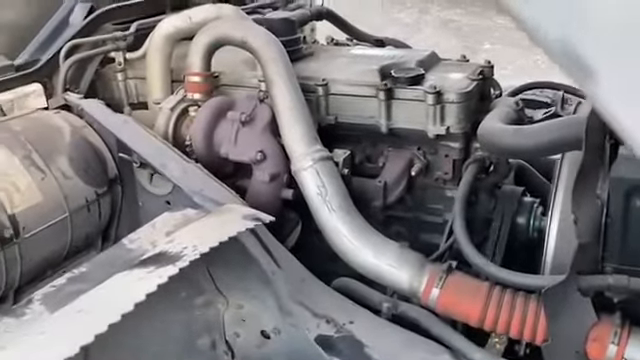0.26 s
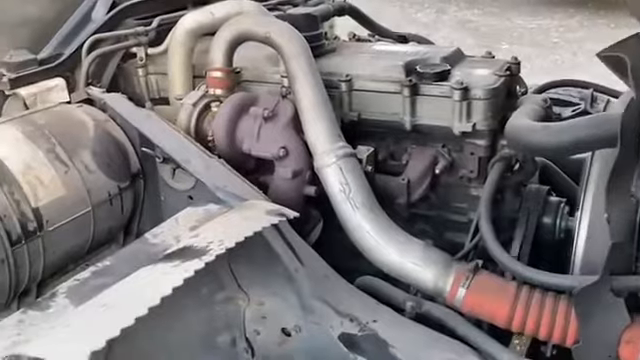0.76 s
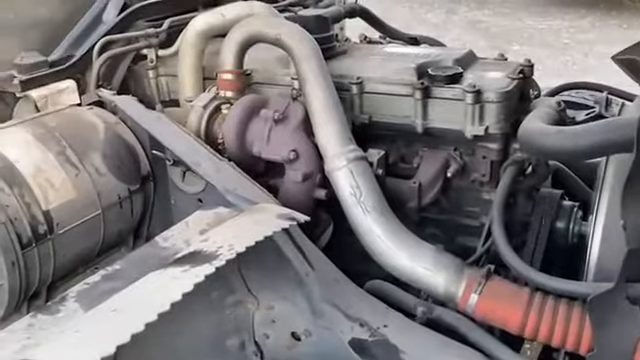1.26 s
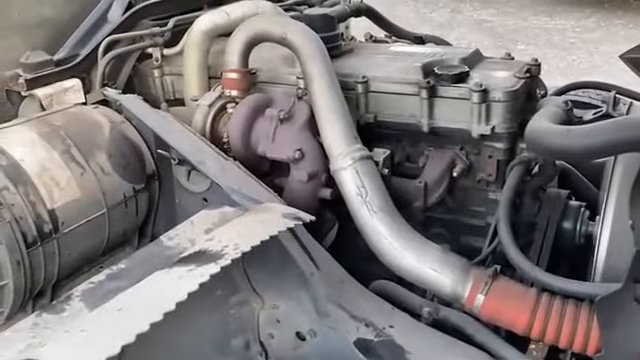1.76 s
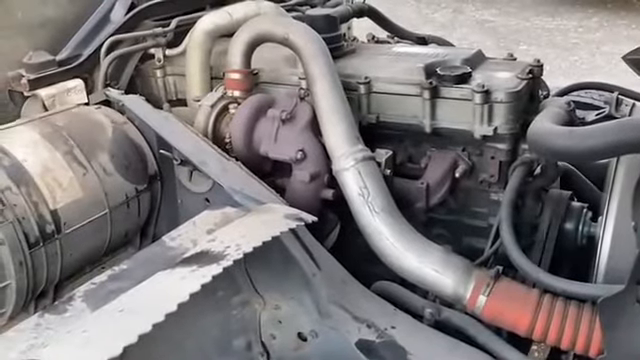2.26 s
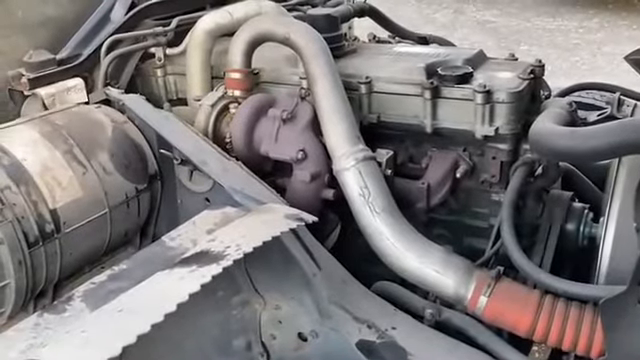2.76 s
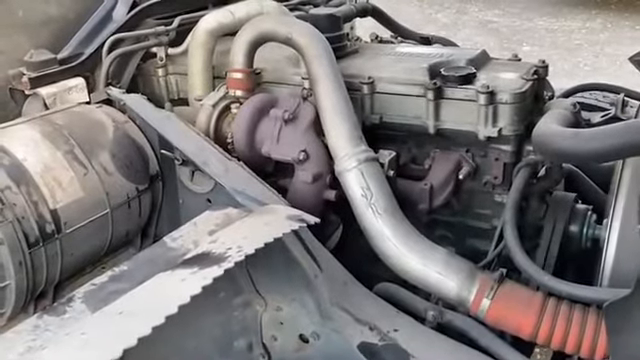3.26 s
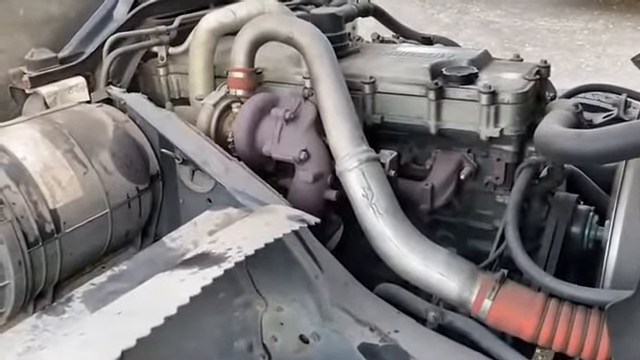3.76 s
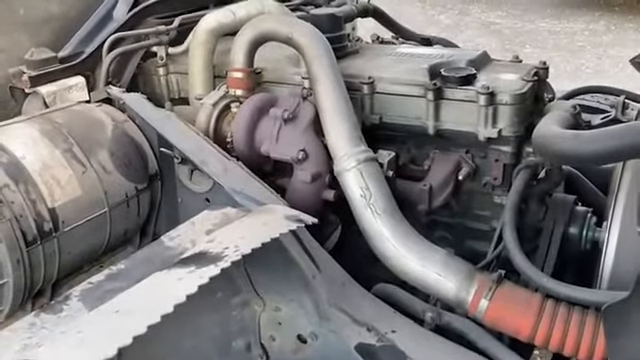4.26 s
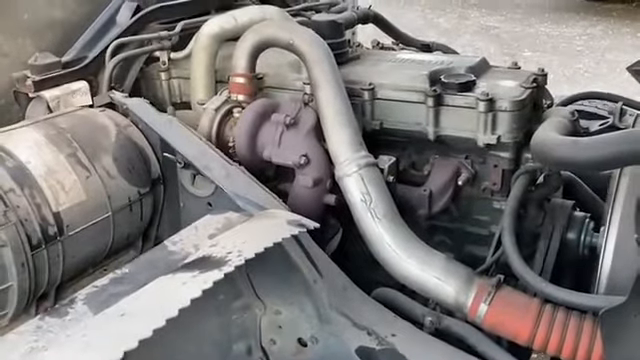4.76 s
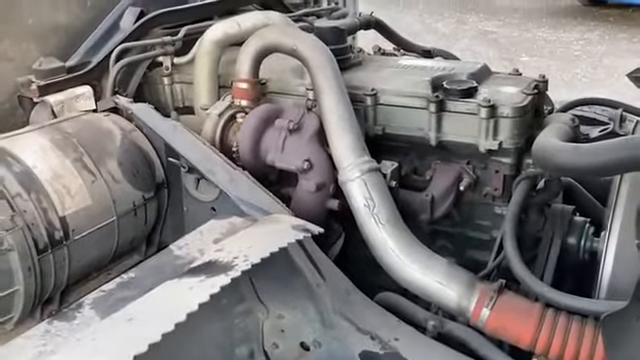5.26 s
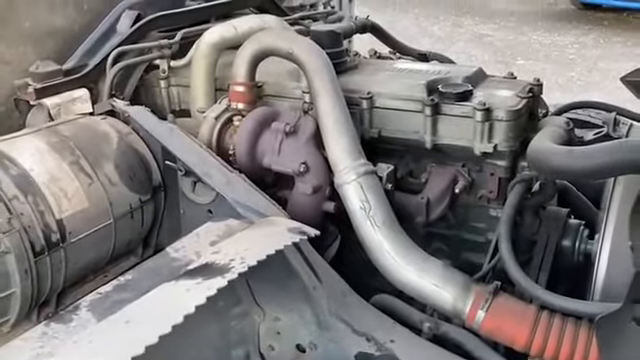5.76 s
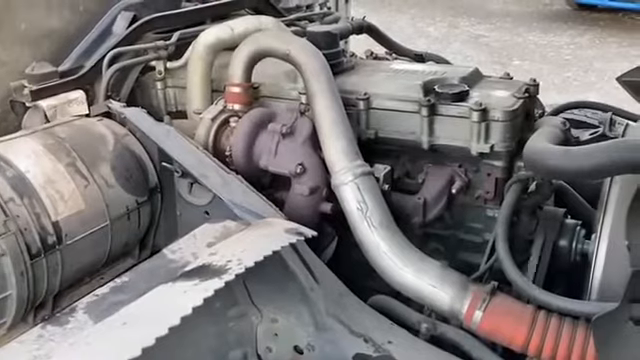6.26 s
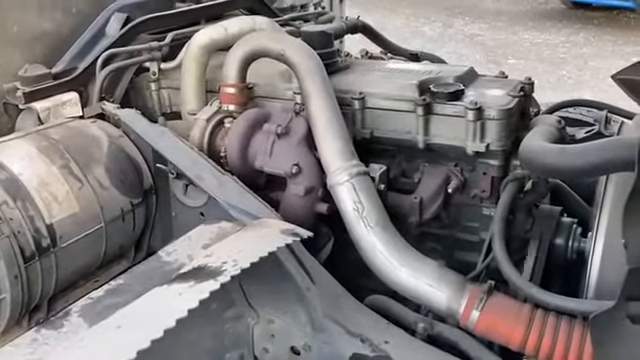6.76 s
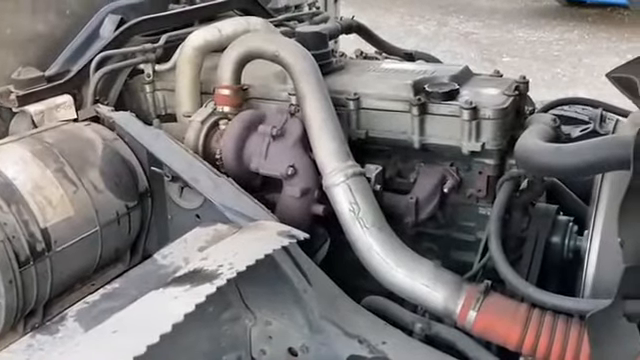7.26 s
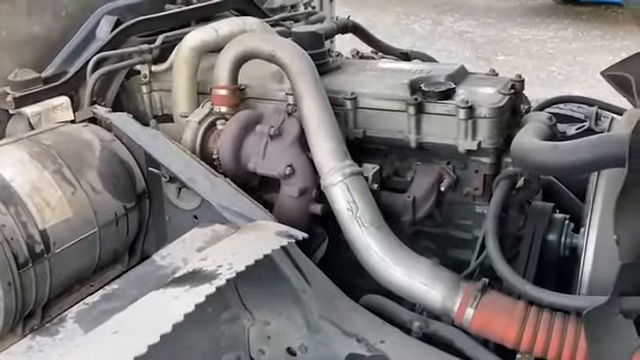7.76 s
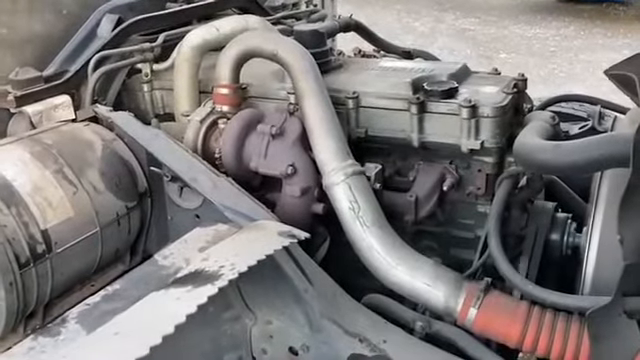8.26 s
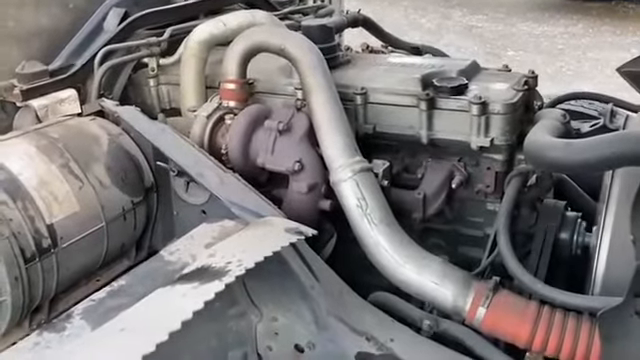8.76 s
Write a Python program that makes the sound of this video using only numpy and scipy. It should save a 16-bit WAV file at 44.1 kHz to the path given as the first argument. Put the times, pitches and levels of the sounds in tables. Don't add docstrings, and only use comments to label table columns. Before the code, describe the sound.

A turbo diesel truck engine knocks at idle, revs hard up to a whistling, clanking peak, coasts down to idle, then starts revving again.

```python
import sys
import numpy as np
from scipy import signal
from scipy.fft import rfft, irfft, next_fast_len
from scipy.io import wavfile
from scipy.ndimage import uniform_filter1d

SR = 44100
rng = np.random.default_rng(int(sys.argv[2]) if len(sys.argv) > 2 else 0)


def wav_out(sig):
    wavfile.write(sys.argv[1], SR, np.round(np.clip(np.atleast_2d(sig).T, -1, 1) * 32767).astype(np.int16))


def voltage_ratio(decibels):
    exponent = np.asarray(decibels, float) / 20
    return 10 ** exponent


N = 397341

CYCLE = 6
CRUISE_FUEL = .5
GOVERNOR_RATE, TOP_RATE = 147, 160
PIPE_LAG_S = 0.022

# time in seconds, firings per second.
CRANK_SPEED = [(0, 29.76), (.62, 30.14), (.68, 31.96), (.78, 41.29), (.87, 44.7), (.97, 51.22),
               (1.18, 62.53), (1.36, 67.62), (1.63, 84.5), (1.95, 94.95), (2.95, 118.82), (3.57, 159.62),
               (4.17, 160.11), (4.82, 110.1), (5.4, 80.1), (6.0, 57.86), (6.62, 36.24), (6.88, 28.81),
               (7.0, 27.27), (7.15, 28.68), (7.4, 29.68), (8.82, 29.96), (8.9, 34.36), (9.01, 47.18)]
# time in seconds, engine level in dB, fuel from 0 to 1.
ENGINE_LOAD = [(0, -28.5, 0.62), (.61, -29, 0.61), (.66, -27.5, 0.46), (.75, -24, 0.99), (.92, -21.5, 0.64),
               (1.5, -21, 0.88), (1.63, -23, 0.72), (2.8, -24, 0.44), (3.4, -22, 0.5), (3.65, -19, 0.58),
               (4.2, -25.5, 0.5), (4.85, -36, 0.06), (5.5, -36, 0.32), (6.75, -43, 0.42),
               (7.0, -43.5, 0.58), (8.7, -41, 0.65), (8.88, -38, 0.63), (9.01, -32.5, 0.63)]
# knock in dB, injector ring in dB, valve tick in dB, exhaust pulse in dB.
CYLINDERS = [(-2.5, 7, 31, -5.5), (-8, 6, 11, -14), (-2, 5.5, 27, 1.5), (-4, 8.5, 32, 2.5),
             (-2.5, 7, 32, -29), (-3.5, 9, 31, 7.5)]
# place in the cycle in firings, level in dB.
VALVES = [(0.6, 29), (1.45, 16), (3.5, 21), (4.5, 12)]
# place in the cycle in firings, level in dB.
EXTRA_KNOCKS = [(.58, -11.5), (1.3, -6), (4.35, -7)]
# time in seconds, peak in dB.
HARD_FIRINGS = [(.633, -8), (.664, -1.5), (.696, -8.5), (0.726, -12), (.777, -6), (0.801, -12), (.824, -5),
                (.913, -2), (0.953, -4), (.973, -19), (1.031, -8), (1.064, -4.5), (1.135, -6), (1.231, -5),
                (1.273, -4), (1.375, -4.5), (8.817, -20.5), (8.851, -21), (8.883, -18.5), (8.938, -23.5),
                (8.964, -21), (8.985, -14.5)]
# time in seconds, pitch in Hz, level in dB.
TURBO_WHISTLE = [(2.75, 5900, -64), (3.08, 7000, -44), (3.3, 8200, -42), (3.45, 8650, -42),
                 (3.56, 9120, -43), (3.72, 9200, -42), (4.1, 9020, -44), (4.25, 8400, -43),
                 (4.42, 7600, -44), (4.55, 7000, -45), (4.8, 6000, -64)]

# multiple of the cycle rate, level in dB.
EXHAUST_ORDERS = [(2, -26), (3, -0.5), (4, -15), (5, -20), (6, -2), (7, -8), (8, -7), (9, -1), (10, -6),
                  (11, -2), (12, -3.5), (13, -6.5), (14, -5.5), (15, -7), (16, -11.5), (18, -8.5),
                  (20, -12.5), (21, -7.5), (22, -16), (24, -13.5), (26, -34), (27, -7.5), (28, -12),
                  (29, -15.5), (30, -10)]
# multiple of the firing rate, lift in dB on the pipe resonance.
PIPE_BOOMS = [(1, 10.5), (2, 5), (3, 8)]
# multiple of the firing rate, dB against the exhaust, dB per unit of fuel.
BOOM_TONES = [(2, -7, -40), (3, 1, 55)]

# frequency in Hz, level in dB.
PIPE_SPECTRUM = [(20, -32), (35, -1.5), (60, 4), (90, -8), (108, -5), (118, 7.5), (142, 9.5), (165, 1),
                 (190, 1.5), (260, -46)]
# frequency in Hz, level in dB.
RUMBLE_SPECTRUM = [(15, -35), (30, -42), (55, -4.5), (100, -2), (145, -0.5), (200, -9), (300, -39.5)]
# frequency in Hz, level in dB.
HUM_SPECTRUM = [(140, -37), (200, 0), (245, 3.5), (290, 0), (375, 0.5), (410, -10), (650, -11), (900, -51)]
# frequency in Hz, level in dB.
AIR_SPECTRUM = [(2500, 3.5), (4000, -1.5), (5500, 3), (7000, 2), (9000, 3), (11000, 3), (12500, 5.5),
                (13300, -10), (14400, 7), (14800, -70)]
# frequency in Hz, level in dB.
BODY_SPECTRUM = [(270, -19), (480, -2.5), (700, -1.5), (1000, -1), (1500, -0.5), (2050, -2.5), (2300, -10),
                 (3500, -16.5), (4700, -13), (6000, -19.5)]
# frequency in Hz, level in dB.
RATTLE_SPECTRUM = [(270, -3), (480, 0.5), (700, 3.5), (1000, 0.5), (1500, -3), (2050, 2), (2300, -0.5),
                   (3500, -13), (4700, -18.5), (6000, -19)]
# frequency in Hz, level in dB.
IDLE_DULLING = [(300, 0.5), (1000, -2.5), (1300, -1.5), (1800, -4), (2300, -3), (3200, 0.5), (6000, -1)]
# frequency in Hz, level in dB.
INJECTOR_SPECTRUM = [(2000, -7), (2600, 8), (4500, 1.5), (5500, -49)]

# frequency in Hz, width in Hz, lift in dB.
BLOCK_MODES = [(681, 260, -4), (909, 36, 4), (1005, 65, 2.5), (1232, 11.5, 3), (1297, 160, 1),
               (1516, 146, -1.5), (1766, 38, 0.5), (1922, 37, 2)]
# frequency in Hz, width in Hz, lift in dB.
IDLE_MODES = [(690, 120, -13), (963, 120, -5.5)]
# frequency in Hz, width in Hz, lift in dB.
INJECTOR_MODES = [(2720, 30, 4), (3755, 70, 0), (4175, 140, 2)]
# frequency in Hz, level in dB, decay by 60 dB in seconds.
COVER_MODES = [(533, -15, .14), (693, -6, .14), (735, -9, .07), (880, -1, .07), (920, -1, .06),
               (960, 0, .09), (1040, -9, .1), (1205, -9, .07), (1306, -9, .1), (1365, -8, .1),
               (1443, -12, .1), (1572, -7, .12), (1653, -8, .07), (1841, -10, .1), (1955, -6, .08),
                 (2095, -9, .08), (2266, -15, .12), (2320, -13, .12), (2562, -12, .1), (2719, -13, .08),
                 (2826, -14, .08)]

# frequency in Hz, likeness from 0 to 1.
PORT_LIKENESS = [(30, .9997), (60, 0.97), (150, 0.97), (400, 0.8), (800, 0.73), (1900, 0.27), (2400, 0),
                 (4200, 0.38), (5500, 0.34), (6200, 0.6), (7000, 0.73), (8000, 0), (8500, 0.62),
                 (9500, 0.52), (11500, 0.48), (13600, 0.72)]
# frequency in Hz, phase in radians.
PORT_LEAD = [(0, 0), (300, 0), (780, .45), (1200, .3), (2000, -1.3), (4000, 0), (5200, -3), (5800, -3.3),
             (6400, -6.1), (7600, -6.6), (8350, -9.35), (9700, -9.5), (10400, -12.4), (12000, -12.8),
             (13000, -15.65), (15000, -15.75)]
# frequency in Hz, left over right in dB.
PORT_TILT = [(60, 1.0), (130, .9), (280, 1.0), (620, 2.5), (1350, 6.5), (2930, 5.0), (6370, .5),
             (13900, 0.0)]

# start in seconds, length in seconds.
MID_GAPS = [(0.064, 0.023), (0.174, 0.105), (0.685, 0.029), (0.801, 0.047), (0.888, 0.267), (1.242, 0.105),
            (1.411, 0.157), (1.637, 0.052), (1.869, 0.047), (2.014, 0.099), (2.241, 0.076), (2.49, 0.058),
            (2.705, 0.145), (3.1, 0.058), (3.222, 0.035), (3.332, 0.116), (3.518, 0.586), (4.174, 0.041),
            (4.29, 0.052), (4.429, 0.023), (4.563, 0.029), (4.656, 0.076), (4.795, 0.023), (4.957, 0.047),
            (5.143, 0.029), (5.468, 0.052), (5.59, 0.023), (5.718, 0.018), (5.793, 0.099), (6.072, 0.029),
            (6.171, 0.023), (6.31, 0.047), (6.513, 0.151), (6.954, 0.058), (7.146, 0.041), (7.262, 0.261),
            (7.674, 0.029), (7.744, 0.029), (8.052, 0.023), (8.168, 0.029), (8.319, 0.076), (8.469, 0.023),
            (8.702, 0.105), (8.951, 0.052)]
# start in seconds, length in seconds.
TOP_OPENINGS = [(0.087, 0.035), (0.279, 0.18), (0.575, 0.11), (0.708, 0.047), (2.241, 0.07), (2.548, 0.07),
                (2.943, 0.07), (3.106, 0.07), (3.245, 0.07), (4.191, 0.07), (4.36, 0.07), (4.452, 0.093),
                (4.656, 0.047), (5.288, 0.07), (5.468, 0.07), (5.613, 0.041), (5.799, 0.035),
                (5.892, 0.041), (6.055, 0.064), (6.211, 0.07), (6.356, 0.041), (6.426, 0.087),
                (6.606, 0.14), (6.821, 0.064), (7.047, 0.07), (7.308, 0.07), (7.634, 0.105), (7.837, 0.122),
                (8.098, 0.029), (8.33, 0.07), (8.818, 0.058), (8.998, 0.023)]
# low edge in Hz, high edge in Hz, silent share of the time.
MID_FLICKER = [(5050, 5500, .2), (5500, 5950, .25), (7900, 8300, .2), (8900, 9700, .2), (9700, 10150, .35),
               (12600, 13100, .4), (13850, 15000, .985)]
# low edge in Hz, high edge in Hz, silent share of the time.
SIDE_FLICKER = [(6300, 7500, .6), (10400, 11300, .3), (11300, 12100, .35)]


def evened(x, span=0):
    power = uniform_filter1d(x ** 2, span, -1) if span else np.mean(x ** 2)
    return x / np.sqrt(abs(power) + 1e-20)


def read(points, hz):
    f, value = np.transpose(points)
    return np.interp(np.log(hz + 1), np.log(f + 1), value)


def curve(rows):
    s, *columns = np.transpose(rows)
    return [np.interp(np.arange(N) / SR, s, c) for c in columns]


def colour(x, points, modes=()):
    size = next_fast_len(x.shape[-1])
    hz = np.fft.rfftfreq(size, 1 / SR)
    humps = sum(voltage_ratio(db) / (1 + (2 * (hz - f) / width) ** 2) for f, width, db in modes)
    gain = voltage_ratio(read(points, hz)) * (1 + 0.97 * humps)
    return irfft(rfft(x, size) * gain, size)[..., :x.shape[-1]]


def drift(hz, part=slice(None)):
    steps = rng.standard_normal(int(N / SR * hz) + 3)
    return np.interp(np.arange(N)[part] / SR * hz, np.arange(len(steps)), steps) * np.sqrt(1.5)


def blend(a, b, share):
    share = np.clip(share, 0, 1)
    return np.sqrt(share) * a + np.sqrt(1 - share) * b


def lagged(x, seconds):
    r = np.exp(-1 / (seconds * SR))
    return x[0] + signal.lfilter([1 - r], [1, -r], x - x[0])


def law(level_db, fuel, rate, offset_db, fuel_db, speed_db):
    return level_db + offset_db + fuel_db * (fuel - CRUISE_FUEL) + speed_db * rate / TOP_RATE


def cycle_hits(firings, place):
    return np.flatnonzero(np.diff(np.floor((firings - place) / CYCLE)))


def blows(firings, places, points, modes, t60, rise, repeat, spread_db):
    t = np.arange(4000) / SR
    fade = voltage_ratio(-60 * t / np.clip(t60, .005, .12)) * np.minimum(t / max(rise, 1e-4), 1)
    same, power = np.zeros((2, N + len(t))), np.zeros(N + len(t))
    for place, db in places:
        ring = rng.standard_normal((2, len(t))) * fade
        sizes = voltage_ratio(db + spread_db * rng.standard_normal(200))
        for at, size in zip(cycle_hits(firings, place), sizes):
            same[:, at:at + len(t)] += size * ring
            power[at:at + len(t)] += (size * fade) ** 2
    fresh = np.sqrt(power[:N]) * rng.standard_normal((2, N))
    return evened(colour(blend(same[:, :N], fresh, repeat), points, modes), span=12000)


def rush(points, modes=(), patchy_db=1.5):
    return evened(colour(rng.standard_normal((2, N)), points, modes) * voltage_ratio(patchy_db * drift(14)))


def spans(rows):
    t = np.arange(N) / SR
    return sum((t >= s - .012) & (t < s + length + .012) for s, length in rows) > 0


def dropped(x, band, when):
    size = next_fast_len(N)
    hz = np.fft.rfftfreq(size, 1 / SR)
    part = irfft(rfft(x, size) * ((hz > band[0]) & (hz < band[1])), size)[:N]
    return x - part * uniform_filter1d(when * 1., 500)


def flickered(x, bands):
    for low, high, share in bands:
        chance = drift(24)
        x = dropped(x, (low, high), chance < np.quantile(chance[::100], share))
    return x


def thinned(pair):
    mid, side = (pair[0] + pair[1]) / 2, (pair[0] - pair[1]) / 2
    mid = dropped(mid, (8300, 9700), spans(MID_GAPS))
    mid = dropped(mid, (13100, 13850), ~spans(TOP_OPENINGS))
    mid, side = flickered(mid, MID_FLICKER), flickered(side, SIDE_FLICKER)
    return np.array([mid + side, mid - side])


def ports(pair):
    size = next_fast_len(N)
    hz = np.fft.rfftfreq(size, 1 / SR)
    a, b = rfft(pair, size)
    same = np.clip(read(PORT_LIKENESS, hz), 0, 1)
    lead = np.interp(hz, *np.transpose(PORT_LEAD))
    right = same * a * np.exp(-1j * lead) + np.sqrt(1 - same ** 2) * b
    tilt = voltage_ratio(read(PORT_TILT, hz) / 2)
    return irfft(np.array([a * tilt, right / tilt]), size)[:, :N]


def turbo():
    hz, db = curve(TURBO_WHISTLE)
    turns = np.cumsum(hz * (1 + 0.0028 * drift(30))) / SR
    return voltage_ratio(db + 3 + 2.5 * drift(25)) * np.sqrt(2) * np.cos(2 * np.pi * turns)


def valve_gear(firings, slow, tick_db, ring_db):
    order = np.arange(len(CYLINDERS))
    ticks = blows(firings, list(zip(order - .04, tick_db)) + VALVES, AIR_SPECTRUM, (),
                  t60=0.049, rise=0.004, repeat=0.071, spread_db=2.4)
    ring = blows(firings, zip(order, ring_db), INJECTOR_SPECTRUM, INJECTOR_MODES,
                 t60=0.24, rise=0.014, repeat=0.51, spread_db=3.0)
    breath = voltage_ratio(5.7 * slow * np.cos(2 * np.pi * (firings - .3) / CYCLE))
    hiss = rush(AIR_SPECTRUM, patchy_db=0.8 + 1.3 * slow) * breath
    return blend(ticks, hiss, 0.56 * slow) + voltage_ratio(-2.0 - 4.7 * (1 - slow)) * ring


def casing_hum(firings, slow, coast, top, pulse_db, casing):
    throb = blows(firings, enumerate(pulse_db), HUM_SPECTRUM, (),
                  t60=0.19, rise=0.019, repeat=0.71, spread_db=2.5)
    rough = blend(throb, rush(HUM_SPECTRUM), 0.44)
    return blend(rough, casing, 1.3 * slow ** 1.2 - 0.47 * coast - .16 * top)


def boom_nearness(rate, fuel):
    resonance_hz = 139.4 + 34.3 * (fuel - CRUISE_FUEL)
    width_hz = 30.7
    return [1 / (1 + (2 * (round(k) * rate - resonance_hz) / width_hz) ** 2) for k, db in PIPE_BOOMS]


def exhaust(firings, rate, fuel):
    coarse, tones = slice(0, N, 16), 0
    for k, db in EXHAUST_ORDERS:
        hz = k * rate[coarse] / CYCLE
        level_db = db + 26 * np.maximum(fuel[coarse] - .45, -.04) * (k % CYCLE == 0)
        level_db = level_db - 14 * (fuel[coarse] - .4) * (k < 5)
        level_db = level_db + 6.0 * (1.05 - rate[coarse] / 200) * drift(5.4, coarse)
        turns = k * firings[coarse] / CYCLE + rng.random() + 0.03 * drift(5.8, coarse)
        wave = voltage_ratio(level_db) * np.cos(2 * np.pi * turns)
        casing_db = read(HUM_SPECTRUM, hz) + 10.5 * (k in (24, 30))
        tones = tones + wave * voltage_ratio([read(PIPE_SPECTRUM, hz), casing_db])
    return evened(signal.resample_poly(tones, 16, 1, axis=1)[:, :N], span=9000)


def pipe_sound(firings, rate, level_db, fuel, coast, near, pipe):
    exhaust_db = law(level_db, fuel, rate, offset_db=0, fuel_db=9.1, speed_db=-11)
    exhaust_db = lagged(exhaust_db, PIPE_LAG_S)
    boom_db = sum(n * db for n, (k, db) in zip(near, PIPE_BOOMS))
    boom_db = boom_db + 18 * coast * near[0]
    rumble_db = law(level_db, fuel, rate, offset_db=-0.47, fuel_db=-13, speed_db=-9.5)
    low = voltage_ratio(exhaust_db + boom_db) * pipe + voltage_ratio(lagged(rumble_db, PIPE_LAG_S)) * rush(RUMBLE_SPECTRUM)
    for k, db, fuel_db in BOOM_TONES:
        k = round(k)
        tone_db = exhaust_db + db + fuel_db * np.clip(fuel - CRUISE_FUEL, -.15, .12)
        swell = near[k - 1] ** 1.7 * np.clip(rate / 12 - 2.6, 0, 1)
        low = low + voltage_ratio(tone_db) * swell * np.cos(2 * np.pi * k * firings)
    return low


def clank(firings, rate):
    t, out = np.arange(4000) / SR, np.zeros(N + 4000)
    ring = 0
    for k, (hz, db, t60) in enumerate(COVER_MODES):
        ring = ring + voltage_ratio(db - 60 * t / t60) * (-1) ** k * np.sin(2 * np.pi * hz * t)
    ring = ring * np.minimum(t / .003, 1)
    for at, chance in zip(cycle_hits(firings, .8), rng.standard_normal(200)):
        out[at:at + len(t)] += voltage_ratio(-15 + .6 * (rate[at] - TOP_RATE) + 1.0 * chance) * ring
    return out[:N]


def hard_firings():
    t, out = np.arange(4000) / SR, np.zeros((2, N + 4000))
    t60, level_db, crack_db = 0.086, -6.5, -21
    fade = voltage_ratio(level_db - 60 * t / t60) * np.minimum(t / .0015, 1)
    for s, db in HARD_FIRINGS:
        body, crack = rng.standard_normal((2, 2, len(t)))
        burst = evened(colour(body, BODY_SPECTRUM, BLOCK_MODES))
        burst = burst + voltage_ratio(crack_db) * evened(colour(crack, AIR_SPECTRUM))
        start = round(s * SR)
        out[:, start:start + len(t)] += voltage_ratio(db) * fade * burst
    return out[:, :N]


def block_knock(firings, fuel, slow, top, knock_db):
    knock = blows(firings, list(enumerate(knock_db)) + EXTRA_KNOCKS, BODY_SPECTRUM, BLOCK_MODES,
                  t60=.085, rise=.003, repeat=.9 - .7 * top, spread_db=1.2)
    softened = 2.8 * slow * np.minimum(fuel - CRUISE_FUEL, 0)
    block = blend(knock, rush(RATTLE_SPECTRUM, BLOCK_MODES), .95 - 0.34 * slow + softened)
    return slow ** 2 * colour(block, IDLE_DULLING, IDLE_MODES) + (1 - slow ** 2) * block


def scene():
    rate = curve(CRANK_SPEED)[0]
    firings = np.cumsum(rate) / SR + .12
    level_db, fuel = curve(ENGINE_LOAD)
    knock_db, ring_db, tick_db, pulse_db = np.transpose(CYLINDERS)

    slow = np.clip(45 / rate, 0, 1)
    top = np.clip((rate - GOVERNOR_RATE) / (TOP_RATE - GOVERNOR_RATE), 0, 1)
    coast = np.maximum(CRUISE_FUEL - fuel, 0)
    near = boom_nearness(rate, fuel)
    pipe, casing = exhaust(firings, rate, fuel + 0.19 * sum(near))

    gear_db = law(level_db, fuel, rate, offset_db=-6, fuel_db=-7.5, speed_db=3.04)
    hum_db = law(level_db, fuel, rate, offset_db=-3.5, fuel_db=-9.5, speed_db=0.14)
    block_db = law(level_db, fuel, rate, offset_db=4.6, fuel_db=1.9, speed_db=1)
    block_db = block_db - 9 * top

    mix = voltage_ratio(gear_db) * valve_gear(firings, slow, tick_db, ring_db)
    mix = mix + voltage_ratio(hum_db) * casing_hum(firings, slow, coast, top, pulse_db, casing)
    mix = mix + pipe_sound(firings, rate, level_db, fuel, coast, near, pipe)
    mix = mix + voltage_ratio(block_db) * block_knock(firings, fuel, slow, top, knock_db) + hard_firings()
    return ports(mix + (turbo() + clank(firings, rate)) * [[1], [0]])


def top_cut(x):
    return signal.sosfilt(signal.butter(12, 14460, fs=SR, output="sos"), x)


def record(dry):
    low_cut = signal.butter(2, 16, "high", fs=SR, output="sos")
    cut = .9 * signal.sosfilt(low_cut, dry)
    ceiling = .84
    soft = cut / (1 + (cut / ceiling) ** 4) ** .25
    return top_cut(thinned(soft))


dry = scene()
out = record(dry)
wav_out(out)
```